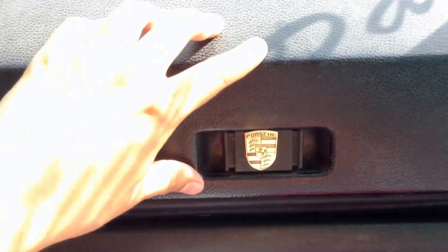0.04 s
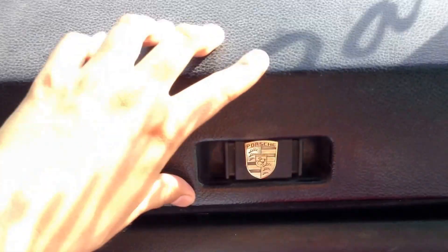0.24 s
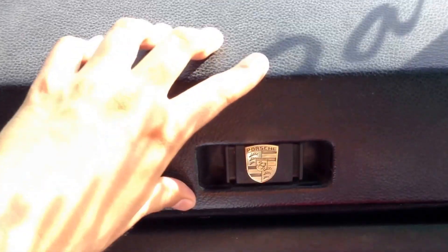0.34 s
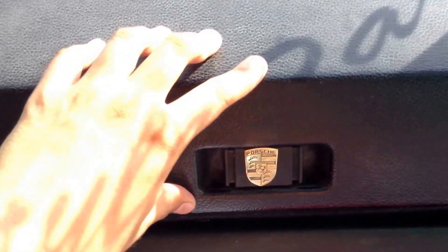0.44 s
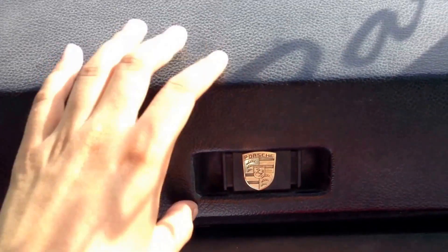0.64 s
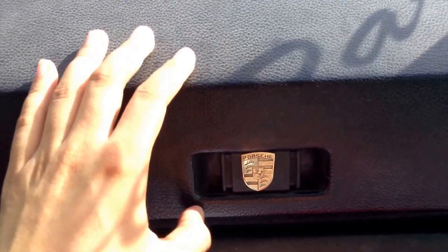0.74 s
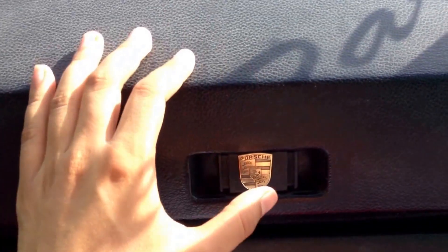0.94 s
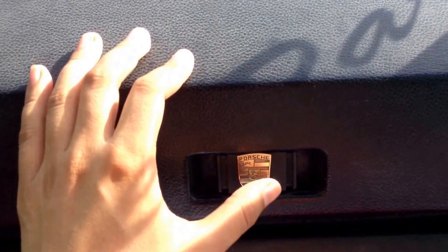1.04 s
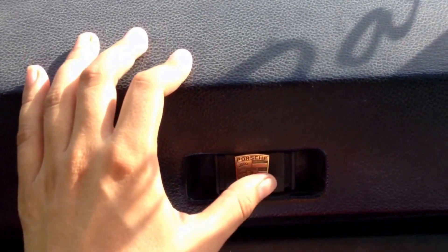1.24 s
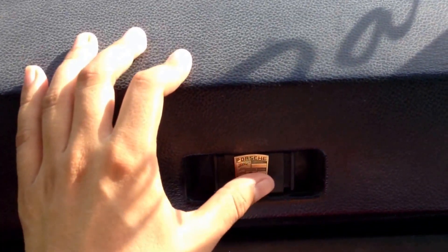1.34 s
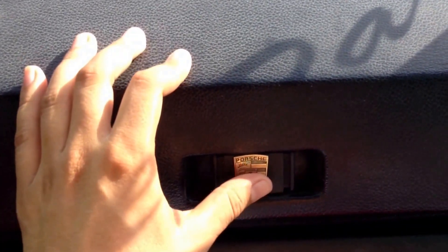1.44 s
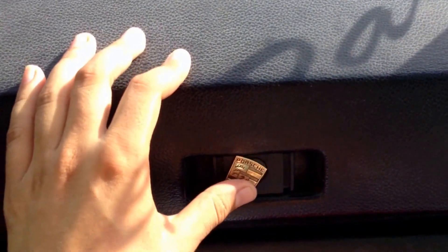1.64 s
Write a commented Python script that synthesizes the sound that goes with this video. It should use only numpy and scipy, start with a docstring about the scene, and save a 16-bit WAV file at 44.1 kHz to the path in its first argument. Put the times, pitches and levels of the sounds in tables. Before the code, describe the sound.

A car glove box thumps shut with a latch click, followed by soft hand knocks.

```python
"""Inside a quiet parked car, one microphone close to the plastic glove box.
A hand bumps the trim and pushes the lid shut: it meets its catch, rides over it and thumps home
as the latch clicks, and the hollow box booms briefly. Then the hand shifts on the dashboard
with soft knocks and scuffs, until only a faint cabin murmur and microphone hiss remain."""
import sys
import numpy as np
from scipy import signal
from scipy.fft import rfft, irfft
from scipy.io import wavfile

SR = 44100
rng = np.random.default_rng(int(sys.argv[2]) if len(sys.argv) > 2 else 0)


def materialize(psi):
    """Save the field psi as 16-bit PCM at rate SR to the path in sys.argv[1].

    A 1-D psi becomes a single channel; in a 2-D psi each row is a channel.
    """
    bounded = np.clip(np.atleast_2d(psi).T, -1, 1)
    quanta = np.round(bounded * 32767).astype(np.int16)
    wavfile.write(sys.argv[1], SR, quanta)


N = 74970


def lid():
    """Each contact rings the lid and hollow box and shakes the dashboard panels around them."""
    # the lid's contacts: time_s, thump_db, clatter_db, brightness_hz
    contacts = [(0.1798, -34, -52.5, 1900), (0.186, -31.5, -43, 1400), (0.1999, -25.5, -51.5, 700),
                (0.2089, -21.5, -41, 1300), (0.2132, -11, -35, 3206), (0.22, -18, -31.5, 2000),
                (0.226, -26, -44, 1500), (0.2382, -34, -47.5, 3000)]
    # modes of the lid and box: pitch_hz, level_db, t60_s
    lid_modes = [(97, -26.5, 0.28), (149.5, -13, .2), (176.5, -14, .16), (218.4, -5, 0.18),
                 (264, 1.5, .085), (295.5, 5.5, 0.057), (405.4, -12.5, .11), (492.4, -22, .07),
                 (632, -17.5, .08), (839, -21.5, 0.071), (932, -15.5, 0.072), (1066, -14, 0.1),
                 (1375, -22, 0.06), (1530, -22.5, .06)]
    # dense resonances of the panels: frequency_hz, density_db, t60_s
    panel_spectrum = [(60, -40, .25), (110, -20, .22), (160, -8.5, 0.32), (300, -3.5, 0.37),
                      (600, -3, 0.099), (1052, -2, .076), (2100, -12, 0.098), (2820, -15.5, .08),
                      (5000, -24.5, 0.05), (9500, -40.5, .05)]
    thump = sum(from_db(db) * soften(ring(s, lid_modes, swell_cycles=0.88), hz)
                for s, db, _, hz in contacts)
    panel_hits = [(s, db, hz) for s, _, db, hz in contacts]
    return thump + dense_ring(panel_hits, panel_spectrum, rise_s=0.002)


def latch():
    """The sprung catch pings on the striker, snaps in and rattles briefly, ringing and crackling."""
    # the snap and its rattles: start_s, level_db
    clicks = [(0.1835, -67.5), (0.2138, -40), (0.2213, -49), (0.2363, -61)]
    # modes of the latch: pitch_hz, level_db, t60_s
    latch_modes = [(2099, -3.5, .06), (4400, -11.5, .04), (4850, -1.5, 0.019), (5610, -13, .02),
                   (6260, -17.5, .03)]
    # the spring's dry crackle: frequency_hz, density_db, t60_s
    crackle_spectrum = [(500, -11.5, .04), (3000, -1.5, 0.075), (5000, 0, .045), (7500, -9.5, .04),
                        (9800, -15.5, .04), (13000, -10, .045)]
    ping_hz, ping_db, ping_t60_s = 2125, -47, 0.037
    crackle_offset_db, crackle_brightness_hz = -11.5, 15000
    ping = ring(start_s=0.1845, modes=[(ping_hz, ping_db, ping_t60_s)], swell_cycles=3)
    ringing = sum(from_db(db) * ring(s, latch_modes, swell_cycles=3) for s, db in clicks)
    spring_hits = [(s, db + crackle_offset_db, crackle_brightness_hz) for s, db in clicks]
    return ping + ringing + dense_ring(spring_hits, crackle_spectrum, rise_s=0.0006)


def hand():
    """The hand knocks softly on the trim, each time with a short scuff of skin."""
    # the hand's bumps: start_s, knock_db, scuff_db, scuff_brightness_hz
    bumps = [(0.0729, -42, -77, 700), (0.0952, -54.5, -73.5, 900), (0.1337, -41.5, -74, 800),
             (0.1450, -47, -61, 1000), (0.3430, -39.5, -53.5, 830), (0.395, -42, -53, 1310),
             (0.4036, -41, -55, 1060), (0.4284, -42.5, -61, 1185), (0.468, -50, -58, 1100),
             (0.4750, -42, -63, 810), (0.5236, -42.5, -54, 700), (0.5325, -39.5, -60, 705),
             (0.5743, -46.5, -70, 600), (0.6480, -49, -62.5, 1700), (0.6630, -44, -58.5, 1000),
             (0.6750, -49, -65, 1100), (0.947, -50.5, -56, 1700), (0.9580, -45, -70, 1200)]
    # modes of the trim: pitch_hz, level_db, t60_s
    trim_modes = [(158, -12, 0.27), (241, -2, .07), (283, 3.5, .048), (567, -14.5, .05), (894, -21, 0.02)]
    # skin on grained plastic: frequency_hz, density_db, t60_s
    scuff_spectrum = [(60, -27.5, .1), (251, -2.5, 0.053), (600, -2.5, 0.083), (1080, -2, 0.046),
                      (1730, -11, 0.037), (6070, -27, .04)]
    knocks = sum(from_db(db) * ring(s, trim_modes, swell_cycles=1.2) for s, db, _, _ in bumps)
    scuff_hits = [(s, db, hz) for s, _, db, hz in bumps]
    return knocks + dense_ring(scuff_hits, scuff_spectrum, rise_s=0.00067)


def cabin_murmur():
    """The low room tone of the car swells a little, then settles."""
    # colour of the murmur: frequency_hz, density_db
    cabin_spectrum = [(25, -5.5), (45, 0.5), (65, 1), (85, -13), (110, -17), (150, 2), (210, -4), (300, -4),
                      (420, -16.5), (700, -17.5), (1200, -25), (2500, -36.5), (6000, -53)]
    # its slow drift: time_s, level_db
    cabin_levels = [(0, -61.5), (.3, -58), (.55, -62.5), (.8, -65), (1.05, -64), (1.3, -65.5), (1.7, -65)]
    level_db = np.interp(np.arange(N) / SR, *np.transpose(cabin_levels))
    return from_db(level_db) * noise(cabin_spectrum)


def microphone_hiss(level_db=-71.5):
    """The microphone's own steady noise floor."""
    # colour of the hiss: frequency_hz, density_db
    hiss_spectrum = [(100, 2.5), (1500, 0), (3000, -1.5), (4400, -1), (6500, -4.5), (8300, -7.5),
                     (9800, -13.5), (11500, -7), (13000, -3.5), (15500, -4)]
    return from_db(level_db) * noise(hiss_spectrum)


def ring(start_s, modes, swell_cycles):
    """A struck body: each mode builds up over a few cycles and dies away."""
    t = np.maximum(np.arange(N) / SR - start_s, 0)
    out = np.zeros(N)
    for hz, db, t60 in modes:
        swell = 1 - np.exp(-t * hz / swell_cycles)
        out += from_db(db - 60 * t / t60) * swell * np.sin(2 * np.pi * hz * t)
    return out


def dense_ring(hits, spectrum, rise_s):
    """Countless close resonances, as half-octave noise bands that die away after each hit."""
    edges = 45 * 2 ** (np.arange(18) / 2)
    centres = np.sqrt(edges[1:] * edges[:-1])
    white = rng.standard_normal((2, N))   # neighbouring bands draw on separate noise
    gains = from_db(at_hz(spectrum, centres)) * np.sqrt(np.diff(edges))
    gains /= np.linalg.norm(gains)
    t = np.arange(SR // 2) / SR
    out = np.zeros(N)
    for k, (hz, gain) in enumerate(zip(centres, gains)):
        bandpass = signal.butter(4, edges[k:k + 2], "band", fs=SR, output="sos")
        band = rms_one(signal.sosfilt(bandpass, white[k % 2]))
        t60 = at_hz(spectrum, hz, column=2)
        envelope = (1 - np.exp(-t / rise_s)) * from_db(-60 * t / t60)
        power = np.zeros(N + SR)
        for start_s, db, brightness_hz in hits:
            start = int(start_s * SR)
            treble_loss = 1 + (hz / brightness_hz) ** 4
            power[start:start + len(t)] += (from_db(db) * envelope) ** 2 / treble_loss
        out += gain * band * np.sqrt(power[:N])
    return out


def soften(x, brightness_hz):
    """A softer contact loses its treble."""
    return signal.sosfilt(signal.butter(2, brightness_hz, fs=SR, output="sos"), x + 1e-18)


def noise(spectrum):
    """Steady noise of a given colour, at unit power."""
    hz = np.arange(N // 2 + 1) * SR / N
    colour = from_db(at_hz(spectrum, hz))
    return rms_one(irfft(rfft(rng.standard_normal(N)) * colour, N))


def at_hz(table, hz, column=1):
    """Read a table column on a log-frequency axis."""
    table = np.array(table)
    return np.interp(np.log(np.maximum(hz, 1)), np.log(table[:, 0]), table[:, column])


def from_db(db):
    """Decibels to gain."""
    return 10 ** (np.asarray(db) / 20)


def rms_one(x):
    """Scale to unit power."""
    return x / np.sqrt(np.mean(x ** 2) + 1e-20)


def scene():
    """Everything at one close microphone, in mono."""
    return (lid() + latch() + hand() + cabin_murmur() + microphone_hiss())[None]


def record(dry, bass_cut_hz=96, treble_cut_hz=15300):
    """The recorder drops the deep bass and cuts the top steeply."""
    highpass = signal.butter(4, bass_cut_hz, "high", fs=SR, output="sos")
    lowpass = signal.ellip(10, .1, 70, treble_cut_hz, fs=SR, output="sos")
    return signal.sosfilt(lowpass, signal.sosfilt(highpass, dry))


dry = scene()
out = record(dry)
materialize(out)
```